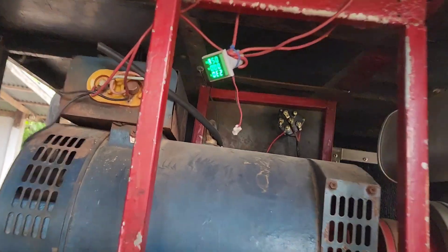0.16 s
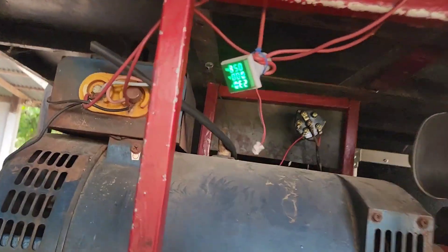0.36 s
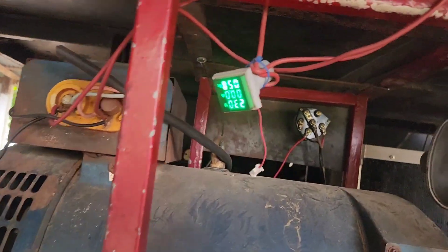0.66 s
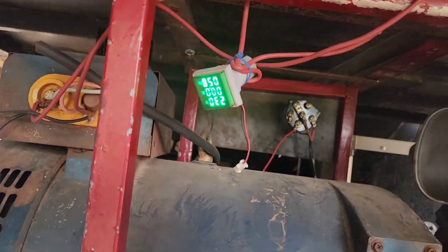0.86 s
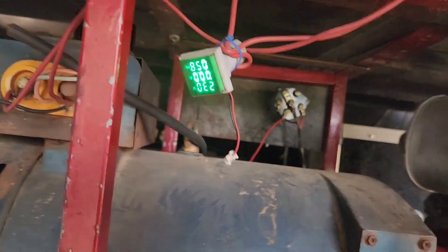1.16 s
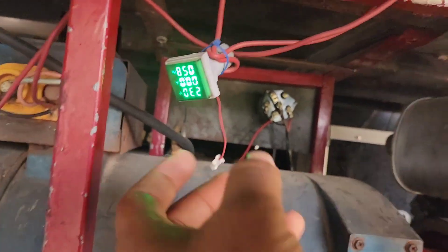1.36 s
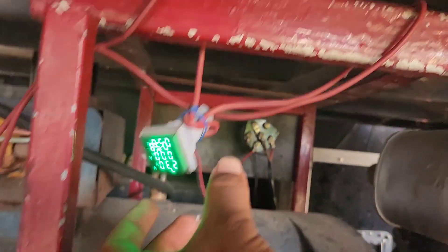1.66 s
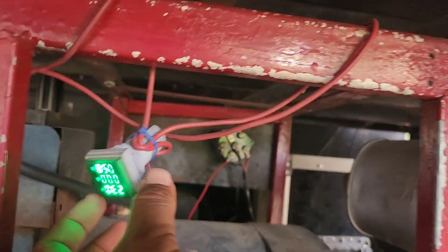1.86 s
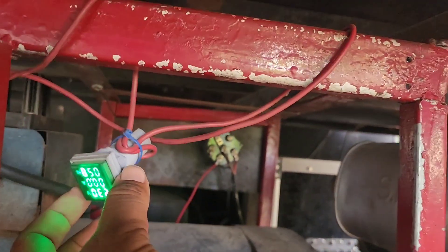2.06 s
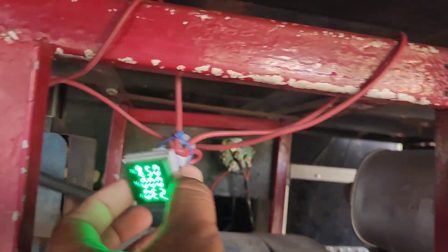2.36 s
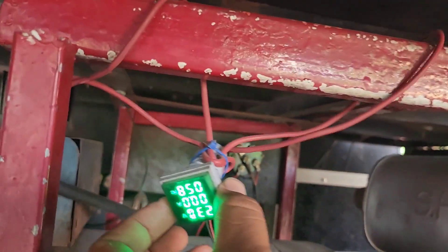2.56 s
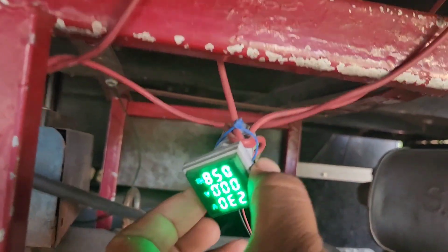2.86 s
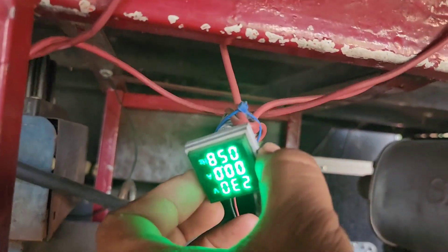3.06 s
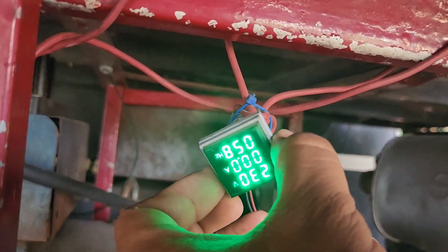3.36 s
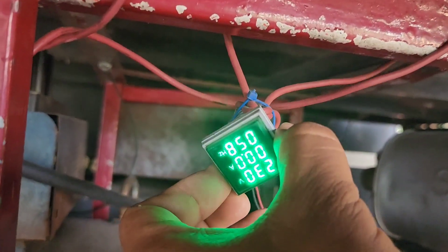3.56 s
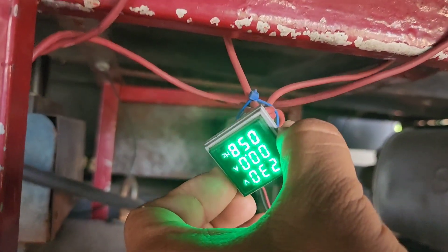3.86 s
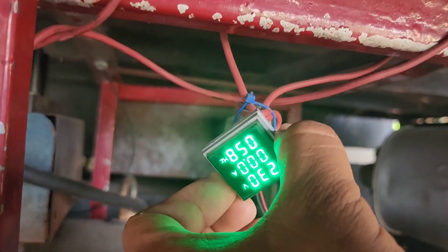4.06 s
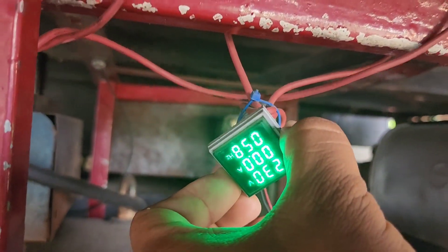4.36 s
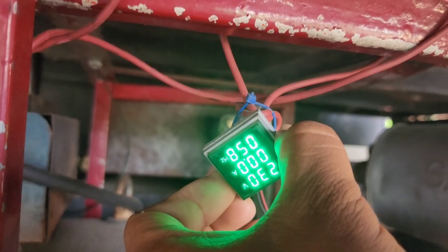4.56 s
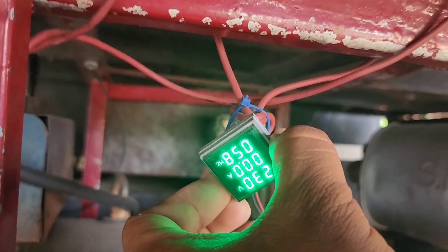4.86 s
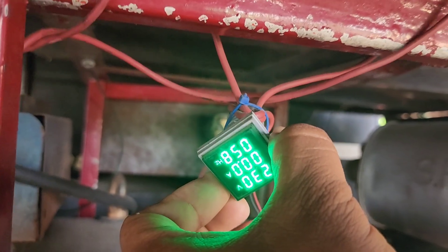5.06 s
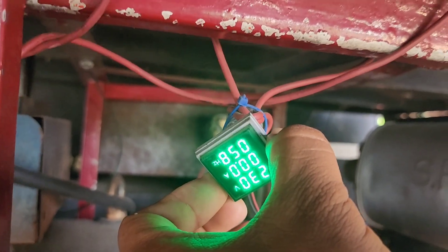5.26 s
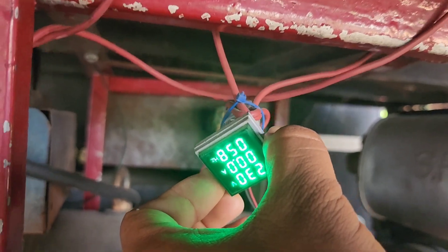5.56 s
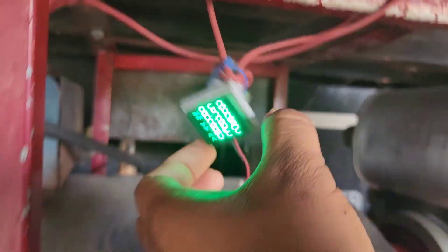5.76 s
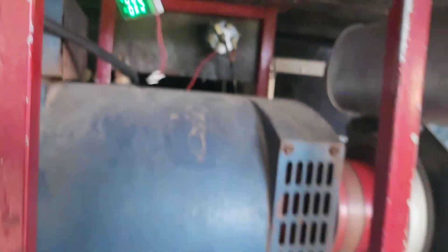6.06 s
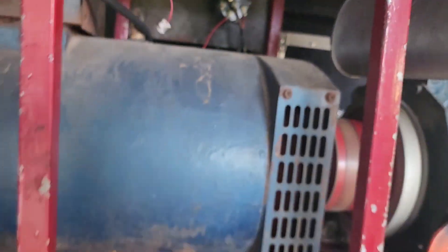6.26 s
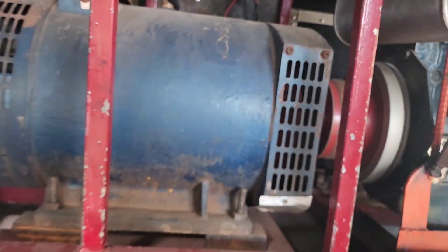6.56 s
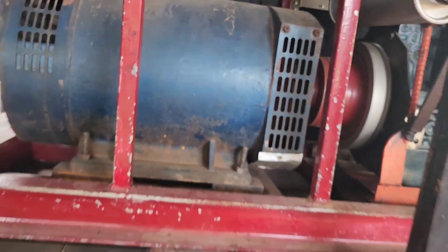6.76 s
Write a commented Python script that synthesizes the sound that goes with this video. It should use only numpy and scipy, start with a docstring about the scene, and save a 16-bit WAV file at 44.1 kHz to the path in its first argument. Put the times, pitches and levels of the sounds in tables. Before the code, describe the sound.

A two-cylinder diesel generator runs at steady speed for the whole seven seconds or so, in an open shed, heard close beside its alternator. The main sound is a deep, even exhaust throb, pulsing about fourteen or fifteen times a second. Lighter metallic knocking and valve ticking keep time with it, over a low rumble from the steel frame and a soft fan hiss.

From the start to about 4 seconds the microphone leans in over the alternator and a faint panel hum grows slightly. Around 1.5 seconds the sheet metal rattle briefly rings a little brighter. The sound holds steady until about 5.6 seconds, when the microphone withdraws, passing the same brighter spot just after 6 seconds. It then sinks behind the alternator, and the engine becomes slightly softer and duller while running on at the same speed.

```python
"""A two-cylinder diesel generator runs at steady speed in an open shed, heard from beside its alternator.
Throughout, the cylinders fire half a turn apart and then rest, so the exhaust throbs once per
four-stroke cycle; combustion and valve gear clatter in the iron, the frame rumbles, the fan hisses.
Over the first 4 s the microphone leans in over the alternator, past a spot where the sheet metal rings
loudest, and the panel hum grows. From 5.6 s it withdraws past that spot and sinks behind the alternator."""
import sys
import numpy as np
from scipy.fft import rfft, irfft, next_fast_len
from scipy.io import wavfile
from scipy.ndimage import uniform_filter1d, map_coordinates

SR = 44100
rng = np.random.default_rng(int(sys.argv[2]) if len(sys.argv) > 2 else 0)


def file_out(sig):
    """Save sig as 16-bit WAV at sys.argv[1]."""
    # one column per channel
    cols = np.atleast_2d(sig).T
    # limit, then scale
    lim = np.clip(cols, -1, 1)
    pcm = np.round(lim * 32767).astype(np.int16)
    wavfile.write(sys.argv[1], SR, pcm)


N = 304068
FFT_SIZE = next_fast_len(N + SR // 4)


def amp(db):
    return 10 ** (np.asarray(db) / 20)


def unit_rms(pair):
    """Stereo pair scaled to a mid rms of 1."""
    return pair / np.sqrt(np.mean(pair.mean(0) ** 2) + 1e-20)


def over_frequency(points, hz):
    """Breakpoints interpolated on a log frequency axis."""
    knots_hz, values = np.transpose(points)
    return np.interp(np.log(hz + 1), np.log(knots_hz + 1), values)


def over_time(points):
    """Breakpoints interpolated per sample."""
    return np.interp(np.arange(N) / SR, *np.transpose(points))


def wobble(rate_hz):
    """Smooth random curve."""
    knots = rng.standard_normal(int(N * rate_hz / SR) + 4)
    return map_coordinates(knots, [np.arange(N) * rate_hz / SR])


def filtered(x, response):
    """x through a complex frequency response."""
    f = np.fft.rfftfreq(FFT_SIZE, 1 / SR)
    return irfft(rfft(x, FFT_SIZE) * response(f), FFT_SIZE)[..., :N]


def resonance(f, hz, width_hz):
    """Causal response of one damped mode."""
    return 1j * f * width_hz / (hz * hz - f * f + 1j * f * width_hz)


# microphone path: (time [s], lean [0 outside the frame, 1 under its roof])
MIC_LEAN = [(0, 0), (1.45, 0.42), (2.2, 0.84), (3.8, 1), (5.6, 0.924), (6.15, 0.44), (6.6, 0.069)]


def mic_level_db(outside_db, lean_db, spot_db, sunk_db):
    """Level of a part outside the frame, plus offsets for lean, loud spot and sinking."""
    spot_lean, spot_width = 0.45, 0.14
    sink_start_s, sink_s = 5.77, 1.0
    lean = over_time(MIC_LEAN)
    spot = np.exp(-((lean - spot_lean) / spot_width) ** 2)
    sunk = np.clip((np.arange(N) / SR - sink_start_s) / sink_s, 0, 1)
    return outside_db + lean_db * lean + spot_db * spot + sunk_db * sunk


# sound field: (frequency [Hz], left-right coherence [0..1])
COHERENCE = [(30, 0.55), (120, 0.17), (300, 0.36), (600, 0.63), (1100, 0), (15000, 0.022)]


def stereo_field(pair, spectrum, balance):
    """Two unrelated signals become a coloured, partly coherent stereo field."""
    def mid_side_gains(f):
        angle = np.arccos(over_frequency(COHERENCE, f)) / 2
        return amp(over_frequency(spectrum, f)) * [np.cos(angle), np.sin(angle)]

    def left_right_gains(f):
        return amp(np.outer([0.5, -0.5], over_frequency(balance, f)))

    mid, side = filtered(pair, mid_side_gains)
    return unit_rms(filtered(np.array([mid + side, mid - side]), left_right_gains))


# blows per cycle: (crank angle [deg], knock [dB], tick [dB], thud [dB])
BLOWS = [(0, -0.5, 0, 6.5), (48.8, -11, 4.5, 3), (115, -4, -12, 3.5), (182.3, -5, 1, 5), (284, -10, -4, -3),
         (419.6, -33, -0.5, 0), (588.3, -12, 0.5, 8)]


def strikes(cycle, kind, t60_s, attack_s, repeat, scatter_db, jitter_s):
    """Each blow starts a dying rattle; the share `repeat` of its power is the same every cycle."""
    angles_deg, *columns = np.transpose(BLOWS)
    levels_db = columns[["knock", "tick", "thud"].index(kind)]
    t = np.arange(SR // 14) / SR
    envelope = amp(-60 * t / t60_s) * (1 - np.exp(-t / attack_s))
    out = np.zeros((2, N + len(t)))
    for angle_deg, db in zip(angles_deg, levels_db):
        recurring = np.sqrt(repeat) * rng.standard_normal((2, len(t)))
        for due in np.flatnonzero(np.diff(np.floor(cycle - angle_deg / 720))):
            at = int(np.clip(due + rng.normal() * jitter_s * SR, 0, N))
            rattle = recurring + np.sqrt(1 - repeat) * rng.standard_normal((2, len(t)))
            out[:, at:at + len(t)] += amp(db + scatter_db * rng.normal()) * envelope * rattle
    return out[:, :N]


def ring(pair, modes, lobe_depth, lobes=6.7, coherence=0.43, left_lag_s=0.00009):
    """Struck metal: each mode swells and fades as the microphone crosses its standing waves."""
    f = np.fft.rfftfreq(FFT_SIZE, 1 / SR)
    right, unrelated = rfft(pair, FFT_SIZE)
    delayed = right * np.exp(-2j * np.pi * f * left_lag_s)
    left = coherence * delayed + np.sqrt(1 - coherence ** 2) * unrelated
    drive = np.array([left, right])
    shapes = np.array([(-1) ** k * resonance(f, *mode[:2]) for k, mode in enumerate(modes)])
    side_gains = amp(np.transpose(modes)[2:])

    def mode_sum(weights):
        return irfft(drive * ((side_gains * weights) @ shapes), FFT_SIZE)[:, :N]

    mode_phase = 2 * np.pi * rng.random(len(modes))
    path_phase = np.pi * lobes * over_time(MIC_LEAN)
    standing = np.cos(path_phase) * mode_sum(np.cos(mode_phase))
    standing += np.sin(path_phase) * mode_sum(np.sin(mode_phase))
    out = mode_sum(0.86) + lobe_depth * standing
    power = np.abs(uniform_filter1d(out.mean(0) ** 2, size=SR // 2))
    return out / np.sqrt(power + 1e-12)  # level stays even while the colour shifts


# cooling air: (frequency [Hz], spectral density [dB])
AIR_SPECTRUM = [(300, -11.5), (900, -4), (1250, -4), (2100, -2), (3450, -1), (4700, 0), (6900, 0.5),
                (7600, 2.5), (8300, -2), (8900, -7), (10000, -11.5), (11700, -3.5), (14000, -5.5),
                (15800, -15.5)]
# its balance: (frequency [Hz], left minus right [dB])
AIR_BALANCE = [(900, 7.5), (2000, -10), (3300, 1.5), (4700, -8.5), (7700, -10.5), (9000, 1), (10200, 0.5),
               (11700, -9), (14000, -4), (15800, -12)]


def fan_and_tappets(cycle, level_db):
    """Cooling air hisses, surging once per cycle; the tappets tick through it."""
    surge_db = 1.1 * np.cos(2 * np.pi * (cycle - 0.25)) + 1.35 * wobble(200) + 0.42 * wobble(12)
    air = stereo_field(amp(surge_db) * rng.standard_normal((2, N)), AIR_SPECTRUM, AIR_BALANCE)
    ticks = strikes(cycle, "tick", t60_s=0.062, attack_s=0.00074,
                    repeat=0.23, scatter_db=4.5, jitter_s=0.0009)
    tappets = stereo_field(ticks, AIR_SPECTRUM, AIR_BALANCE)
    return amp(level_db + 7) * air + amp(level_db + 1) * tappets


# panel tones: (order [x cycle rate], level [dB])
PANEL_ORDERS = [(33, -47), (49, -51)]


def panel_hum(cycle):
    """Panels hum in tune with the engine."""
    hum = np.zeros(N)
    for order, db in PANEL_ORDERS:
        hum += amp(db + 0.46 * wobble(5.9)) * np.sqrt(2) * np.sin(2 * np.pi * order * cycle)
    level_db = mic_level_db(outside_db=-2, lean_db=3.5, spot_db=0, sunk_db=-1)
    return amp(level_db) * amp([[1.5], [-2]]) * hum


# frame rumble and thud: (frequency [Hz], spectral density [dB])
RUMBLE_SPECTRUM = [(20, -24), (32, -6), (45, -2), (115, 10), (190, 3), (290, 0.5), (400, -4), (520, -8),
                   (660, -5.5), (800, -7.5), (950, -10.5), (1200, -15.5), (2000, -16), (4000, -55)]
THUD_SPECTRUM = [(250, -18), (430, -16), (570, -4.5), (680, -2), (900, -15), (1400, -11), (3000, -28.5)]
# their balance: (frequency [Hz], left minus right [dB])
FRAME_BALANCE = [(100, 4.5), (400, -4.5), (700, 3.5), (1000, -4)]


def frame(cycle):
    """The steel frame rumbles and thuds under each blow."""
    shake = amp(1.4 * np.cos(2 * np.pi * (cycle - 0.2)))
    rumble = stereo_field(shake * rng.standard_normal((2, N)), RUMBLE_SPECTRUM, FRAME_BALANCE)
    blows = strikes(cycle, "thud", t60_s=0.032, attack_s=0.00032,
                    repeat=0.82, scatter_db=1.5, jitter_s=0.00005)
    thuds = stereo_field(blows, THUD_SPECTRUM, FRAME_BALANCE)
    level_db = mic_level_db(outside_db=-36, lean_db=-3, spot_db=-1.5, sunk_db=-1.5)
    return amp(level_db + 6) * rumble + amp(level_db - 6) * thuds


# injector lines: (frequency [Hz], width [Hz], left [dB], right [dB])
INJECTOR_MODES = [(6240, 110, -11, -8), (7460, 58, -2, 3), (7500, 90, -4, 2), (7630, 63, -22, -11)]


def injector_lines(cycle, level_db):
    """The injector lines clink at each tick."""
    ticks = strikes(cycle, "tick", t60_s=0.12, attack_s=0.0004,
                    repeat=0.35, scatter_db=5.5, jitter_s=0.00028)
    return amp(level_db - 3.5) * ring(ticks, INJECTOR_MODES, lobe_depth=0.17)


# alternator housing: (frequency [Hz], width [Hz], left [dB], right [dB])
HOUSING_MODES = [(895, 39, -3.5, -5), (980, 70, -3.5, -0.5), (1049, 100, -7, -2.5), (1357, 95, -13.5, -11),
                 (1625, 106, -19, -8.5)]


def housing(cycle):
    """Combustion knock and piston slap ring the alternator housing."""
    knocks = strikes(cycle, "knock", t60_s=0.18, attack_s=0.0025,
                     repeat=0.42, scatter_db=2.5, jitter_s=0.0001)
    level_db = mic_level_db(outside_db=-41, lean_db=-3.5, spot_db=1.5, sunk_db=-1.5)
    return amp(level_db) * ring(knocks, HOUSING_MODES, lobe_depth=0.18)


# sheet-metal covers: (frequency [Hz], width [Hz], left [dB], right [dB])
COVER_MODES = [(2663, 152, -0.5, 2), (2770, 94, -6.5, -6.5), (2863, 34, -1.5, 4), (2990, 23, 1, 3),
               (3141, 46, -3, 3.5), (3280, 42, -13, 1)]


def covers(cycle):
    """The knocks ring the covers in short, bright bursts."""
    knocks = strikes(cycle, "knock", t60_s=0.03, attack_s=0.0014,
                     repeat=0.43, scatter_db=3, jitter_s=0.0003)
    level_db = mic_level_db(outside_db=-36.5, lean_db=-4.5, spot_db=3, sunk_db=-2.4)
    return amp(level_db) * ring(knocks, COVER_MODES, lobe_depth=0.15)


# iron block: (frequency [Hz], width [Hz], left [dB], right [dB])
BLOCK_MODES = [(1833, 36, -14, -3), (2020, 260, -15, -15), (3960, 61, -11, 0), (4183, 58, -17, 1.5),
               (4400, 53, -30, 3.5), (4508, 64, -23, 1), (4600, 36, -3, 0), (4700, 59, -9.5, 6),
               (4880, 43, -15, -2), (5480, 56, -30, -1.5), (5620, 72, -30, -7), (5810, 36, -31, 1),
               (5870, 65, -5.5, -6.5)]
# its ring: (time [s], level [dB])
BLOCK_LEVEL = [(0, -34.5), (1.3, -38.5), (2.15, -35.5), (3.1, -39), (3.8, -36.8), (4.6, -38), (5.25, -35.5),
               (5.8, -38), (6.89, -36.3)]


def block(cycle):
    """The knocks ring the block; the hollow under the roof lifts one band as the microphone leans in."""
    knocks = strikes(cycle, "knock", t60_s=0.06, attack_s=0.00042,
                     repeat=0.24, scatter_db=2.5, jitter_s=0.0003)
    iron = ring(knocks, BLOCK_MODES, lobe_depth=0.36)
    hollow = filtered(iron, lambda f: resonance(f, hz=1760, width_hz=260))
    return amp(over_time(BLOCK_LEVEL)) * (iron + over_time(MIC_LEAN) ** 4 * hollow)


# exhaust note: (order [x cycle rate], level [dB])
EXHAUST_ORDERS = [(2, -33.5), (3, -26.5), (4, -20.0), (5, -12.0), (6, -29.5), (7, -7.0), (8, -1.0),
                  (9, 0.0), (10, -15.5), (11, -10.0), (12, -21.5), (13, -35.0), (14, -24.5), (15, -18.0),
                  (16, -18.5), (17, -20.5), (18, -28.5), (19, -15.5), (20, -27.5), (21, -19.0), (22, -25.0),
                  (23, -32.0), (24, -18.5), (25, -24.5), (26, -30.0), (27, -30.5), (28, -33.0), (29, -33.5),
                  (30, -45.5), (31, -35.5), (32, -31.5), (33, -32.5)]
# cylinder puffs: (crank angle [deg], strength [relative])
PUFFS = [(0, 1), (183, .9)]
# exhaust pipe: (frequency [Hz], width [Hz], level [dB])
PIPE_MODES = [(227, 37, -16), (360, 112, -13)]


def exhaust(cycle, crossover_hz=190):
    """Engine orders, phased as two puffs ringing the silencer's two chambers and the pipe."""
    boom, bark = np.zeros((2, N))
    cycle_hz = cycle[-1] * SR / N
    for order, db in EXHAUST_ORDERS:
        f = order * cycle_hz
        puffs = -sum(size * np.exp(-2j * np.pi * order * deg / 720) for deg, size in PUFFS)
        silencer = resonance(f, hz=110, width_hz=89) ** 2
        pipe = sum(amp(mode_db) * resonance(f, hz, width_hz) for hz, width_hz, mode_db in PIPE_MODES)
        tone = amp(db) * np.cos(2 * np.pi * order * cycle + np.angle(puffs * (silencer + pipe)))
        if f < crossover_hz:
            boom += tone
        else:
            bark += tone
    boom_db = mic_level_db(outside_db=-17, lean_db=-1, spot_db=0.2, sunk_db=-1.3)
    bark_db = mic_level_db(outside_db=-30, lean_db=0.63, spot_db=-0.6, sunk_db=-4)
    # no two firings are equally strong
    boom = amp(boom_db + 0.18 * wobble(25.1)) * unit_rms(boom * amp([[-0.2], [0.2]]))
    bark = amp(bark_db + 0.2 * wobble(25)) * unit_rms(bark * amp([[-0.6], [0.6]]))
    return boom + bark


# slight governor hunting: (time [s], four-stroke cycle rate [Hz])
CYCLE_RATE = [(0, 14.519), (1.2, 14.547), (1.75, 14.52), (2.45, 14.569), (3.65, 14.541), (4.15, 14.482),
              (5.0, 14.585), (6.5, 14.554)]


def scene():
    """One crankshaft times everything."""
    cycle = 0.154 + np.cumsum(over_time(CYCLE_RATE)) / SR  # cycles turned, 720 deg each
    treble_db = mic_level_db(outside_db=-41, lean_db=-0.3, spot_db=0.05, sunk_db=-2.2)
    throb = exhaust(cycle)
    clatter = housing(cycle) + covers(cycle) + block(cycle) + injector_lines(cycle, treble_db)
    background = frame(cycle) + panel_hum(cycle) + fan_and_tappets(cycle, treble_db)
    return background + clatter + throb


def record(dry):
    """The microphone passes nothing above its band limit."""
    limit_hz = 15850
    return filtered(dry, lambda f: f < limit_hz)


dry = scene()
out = record(dry)
file_out(out)
```